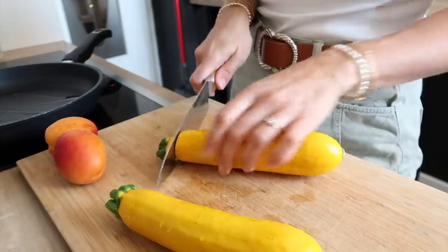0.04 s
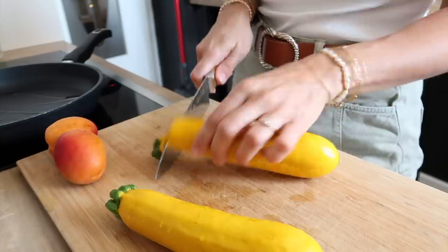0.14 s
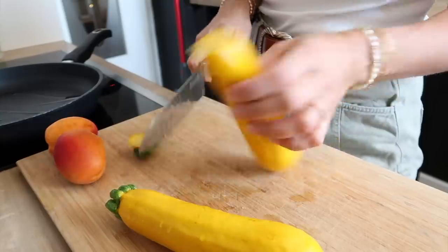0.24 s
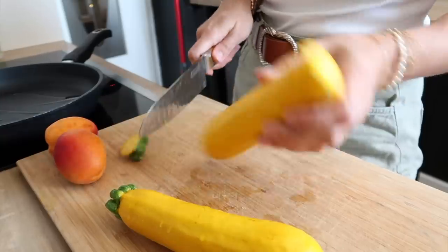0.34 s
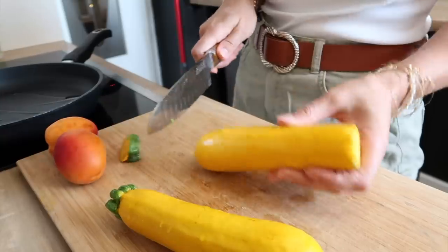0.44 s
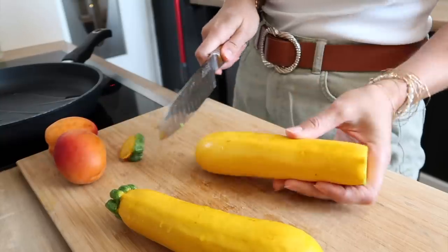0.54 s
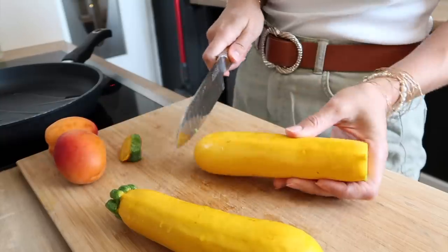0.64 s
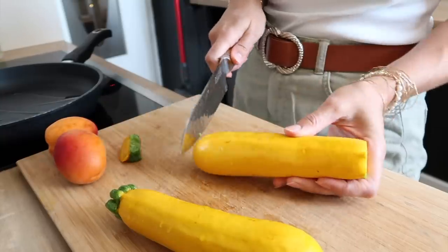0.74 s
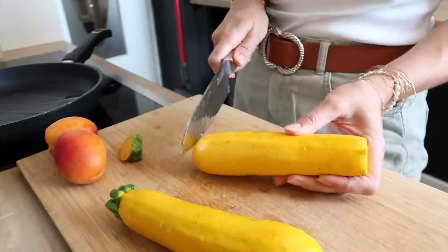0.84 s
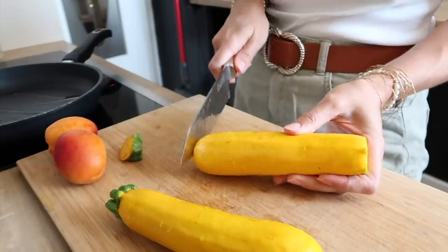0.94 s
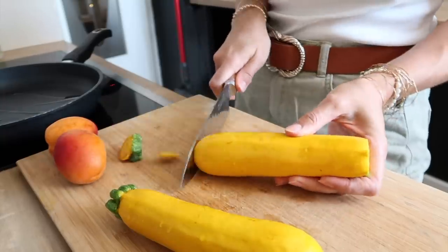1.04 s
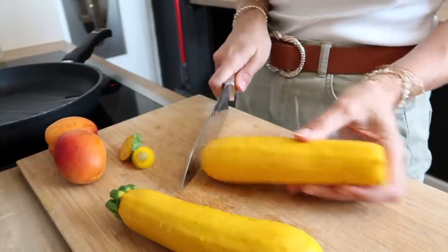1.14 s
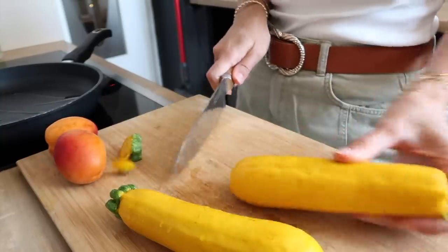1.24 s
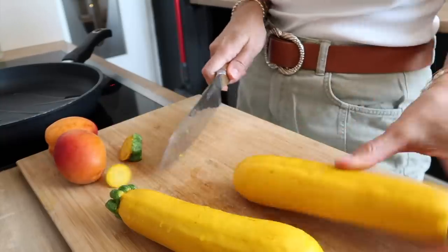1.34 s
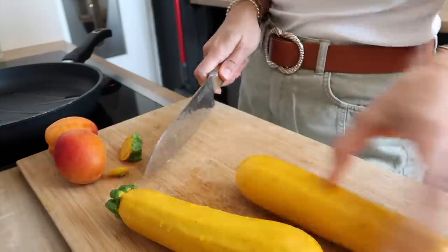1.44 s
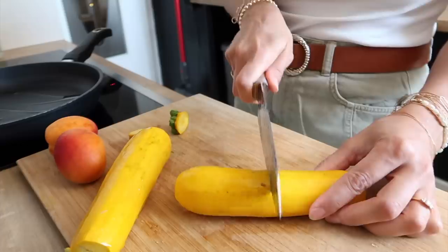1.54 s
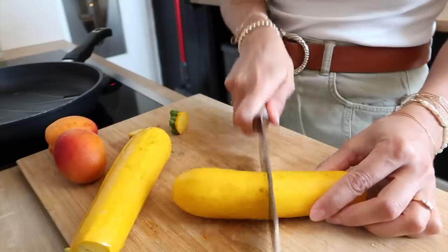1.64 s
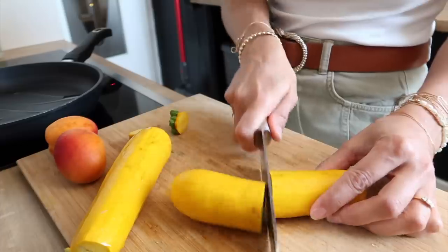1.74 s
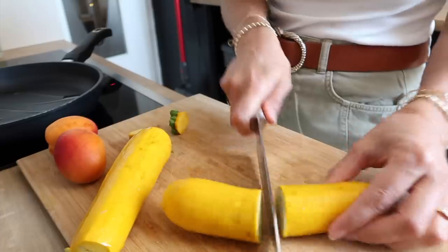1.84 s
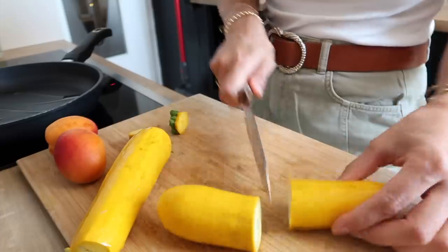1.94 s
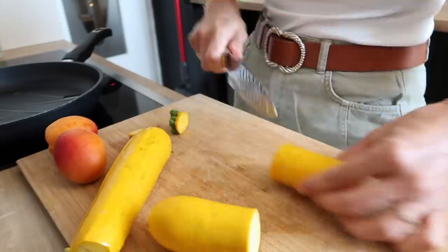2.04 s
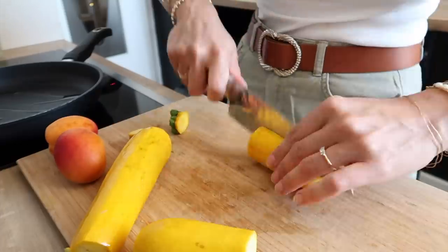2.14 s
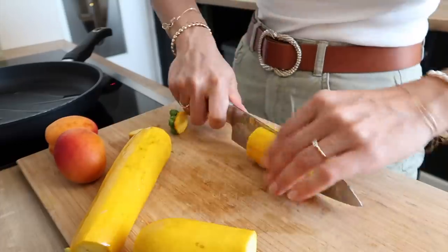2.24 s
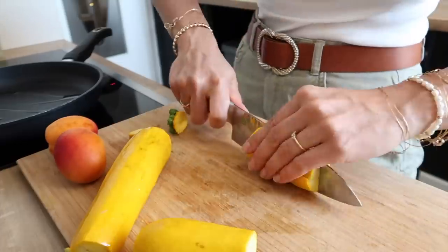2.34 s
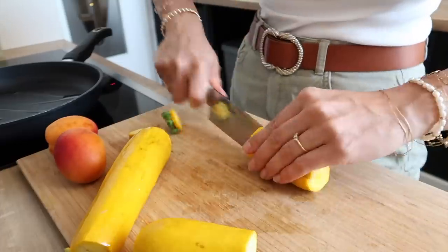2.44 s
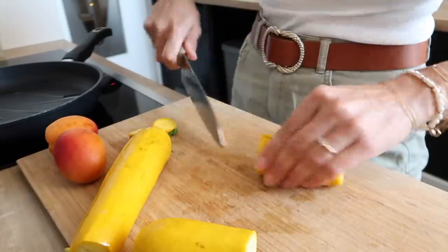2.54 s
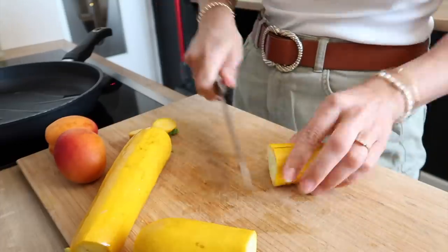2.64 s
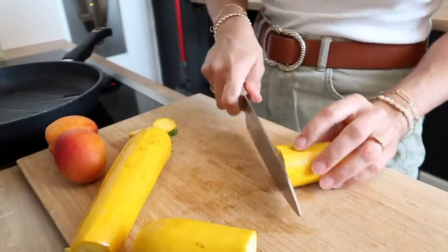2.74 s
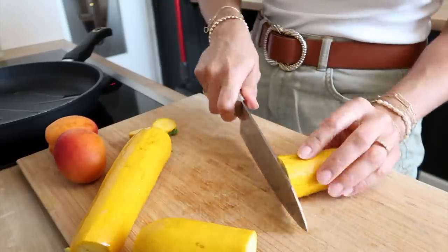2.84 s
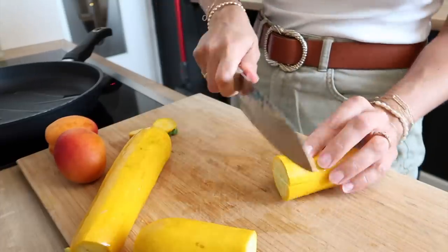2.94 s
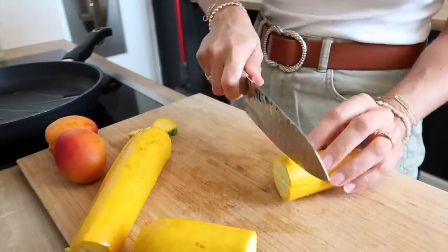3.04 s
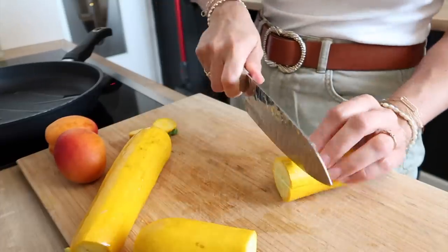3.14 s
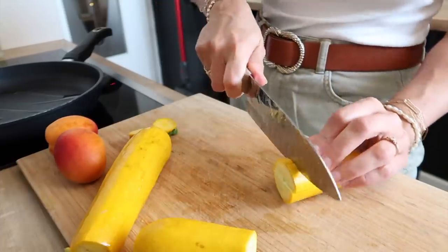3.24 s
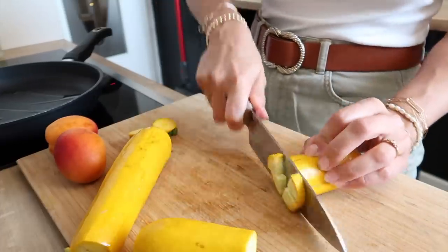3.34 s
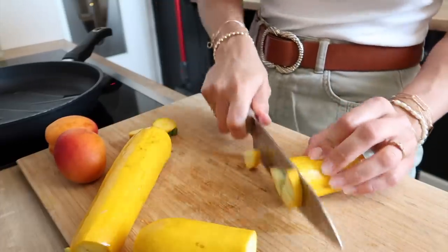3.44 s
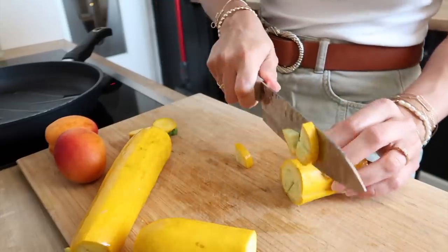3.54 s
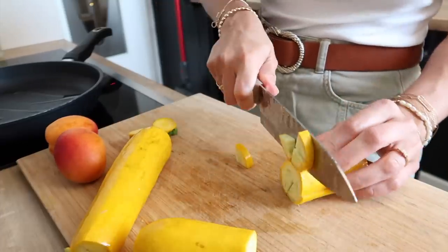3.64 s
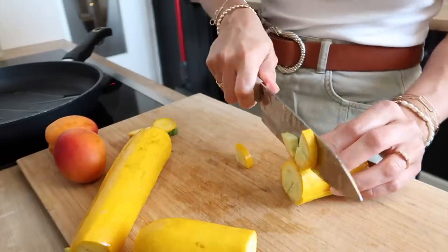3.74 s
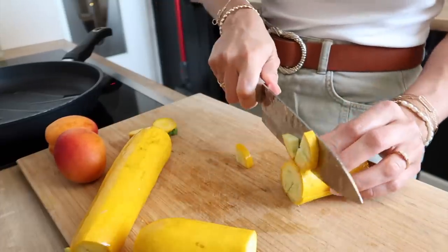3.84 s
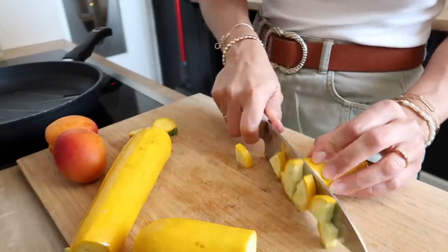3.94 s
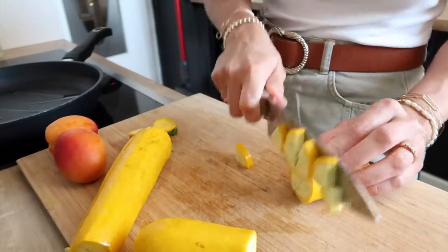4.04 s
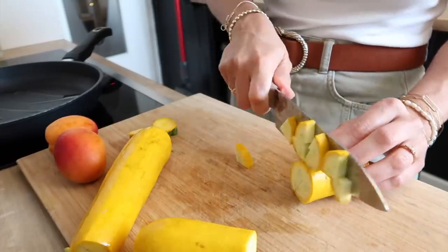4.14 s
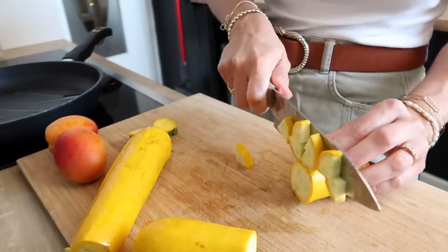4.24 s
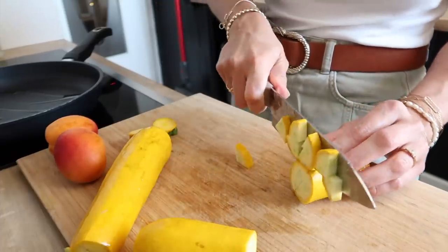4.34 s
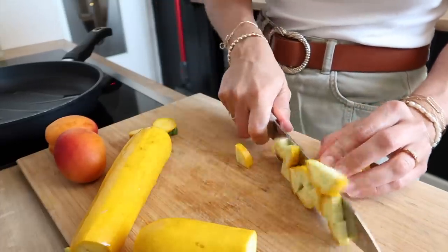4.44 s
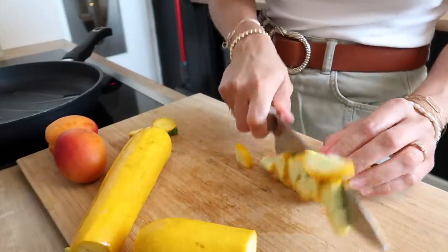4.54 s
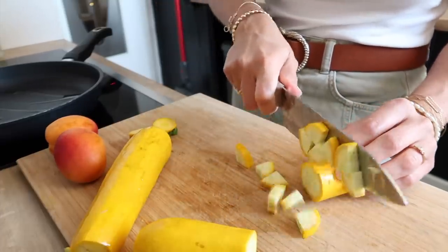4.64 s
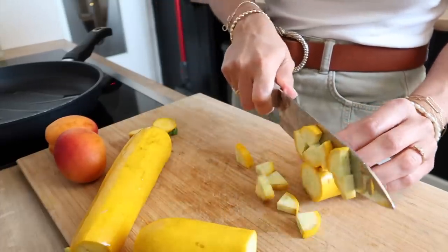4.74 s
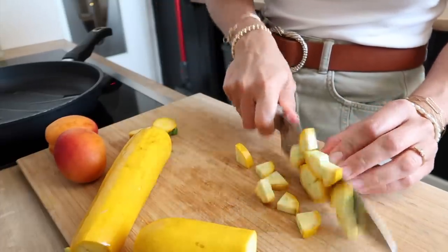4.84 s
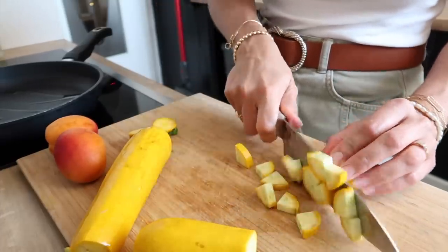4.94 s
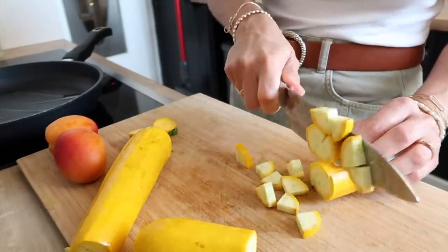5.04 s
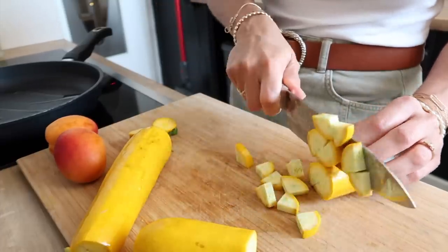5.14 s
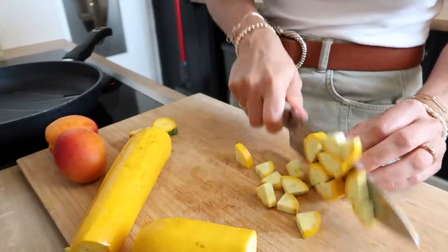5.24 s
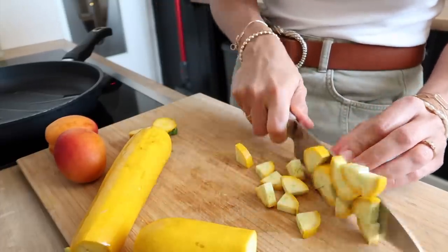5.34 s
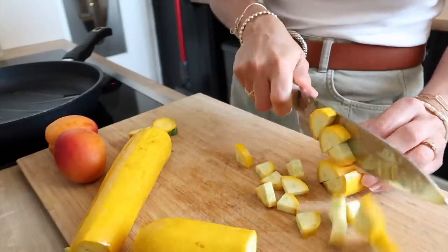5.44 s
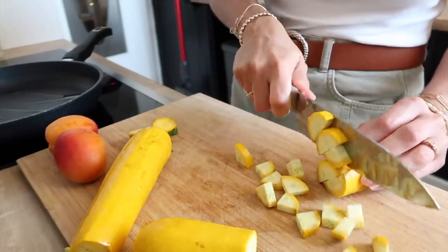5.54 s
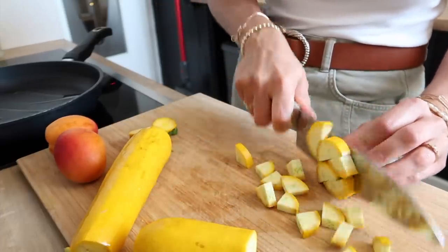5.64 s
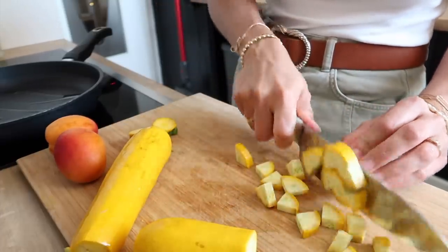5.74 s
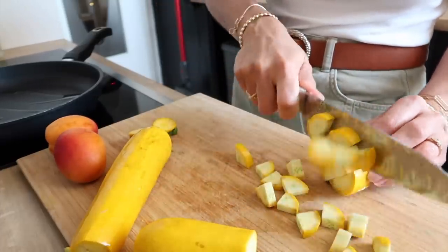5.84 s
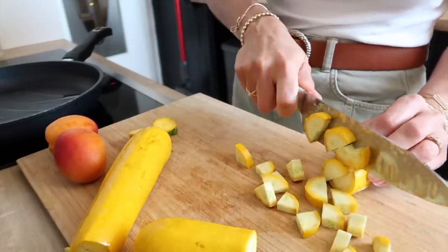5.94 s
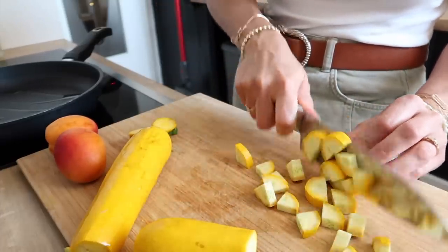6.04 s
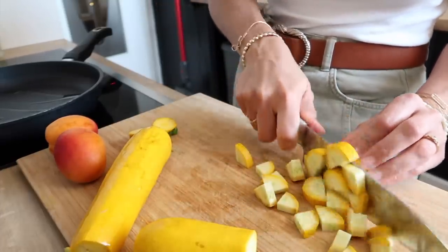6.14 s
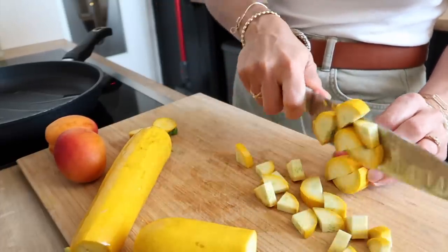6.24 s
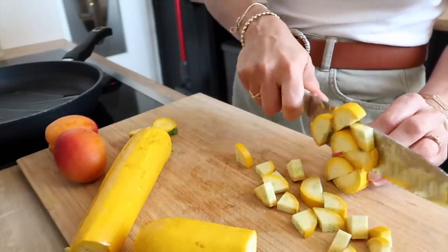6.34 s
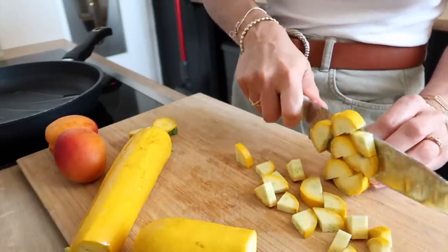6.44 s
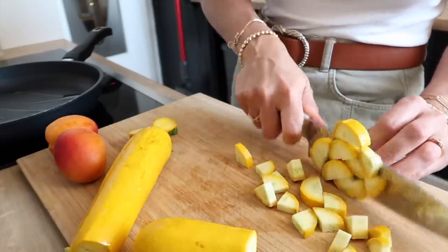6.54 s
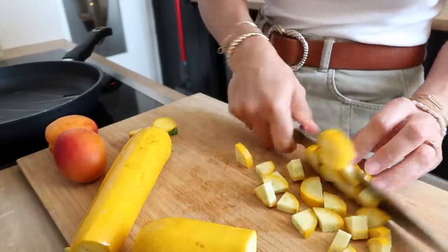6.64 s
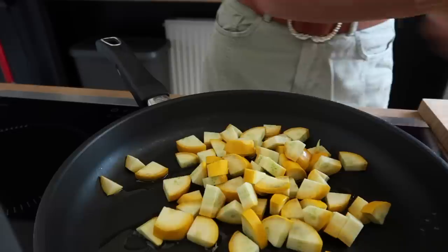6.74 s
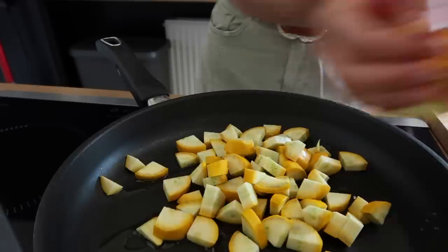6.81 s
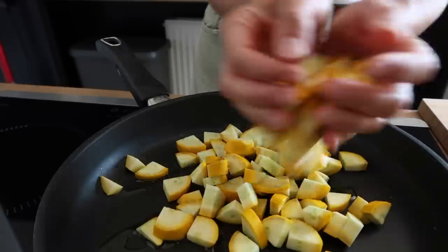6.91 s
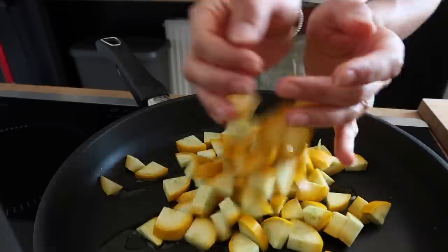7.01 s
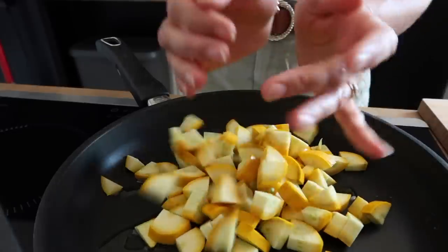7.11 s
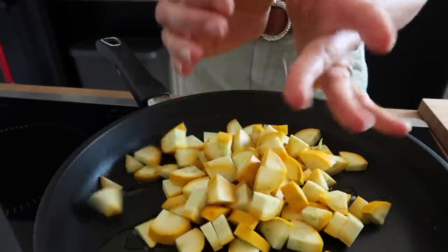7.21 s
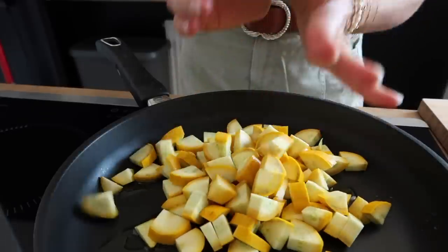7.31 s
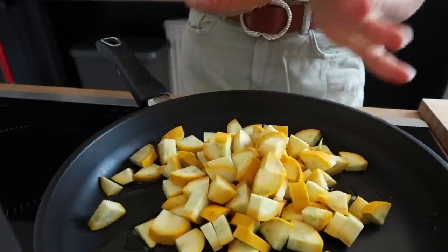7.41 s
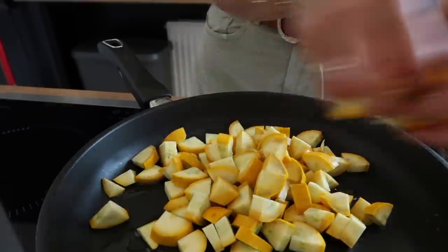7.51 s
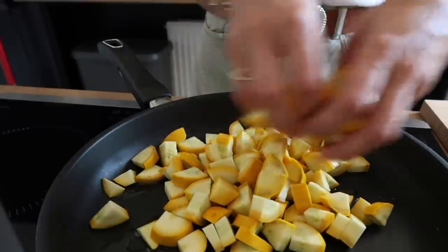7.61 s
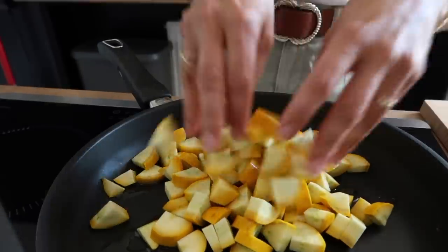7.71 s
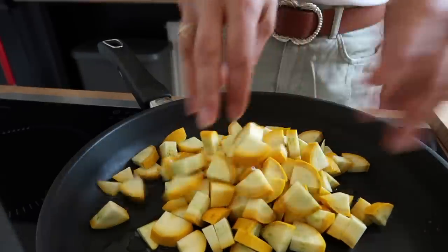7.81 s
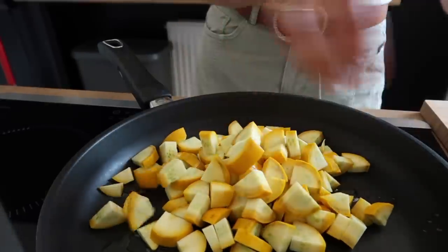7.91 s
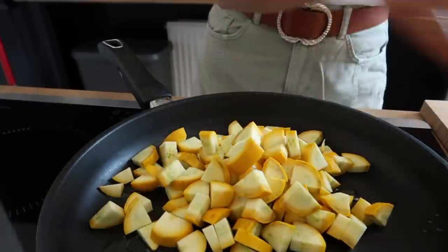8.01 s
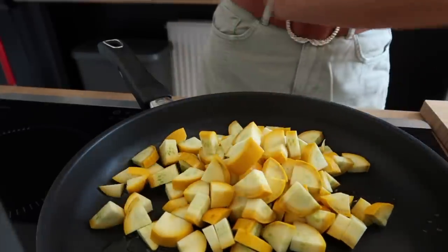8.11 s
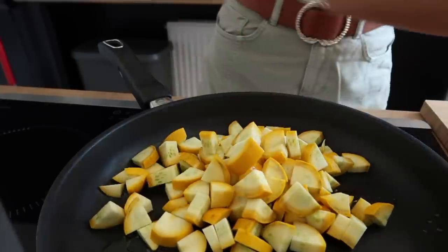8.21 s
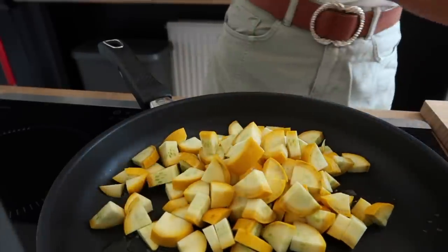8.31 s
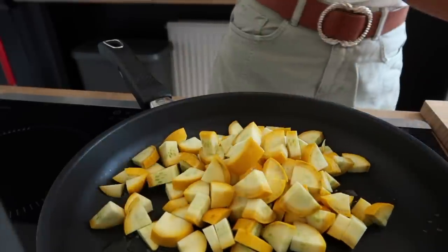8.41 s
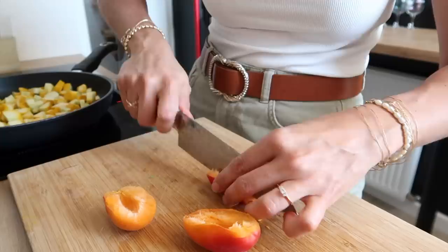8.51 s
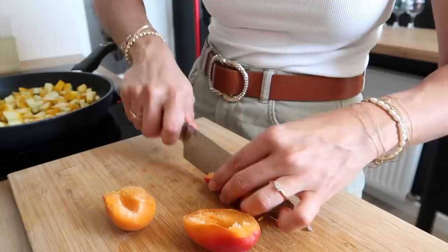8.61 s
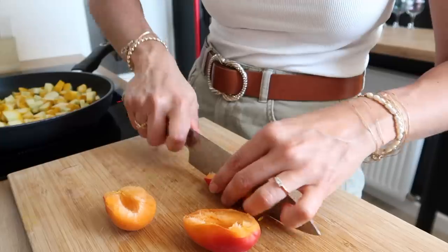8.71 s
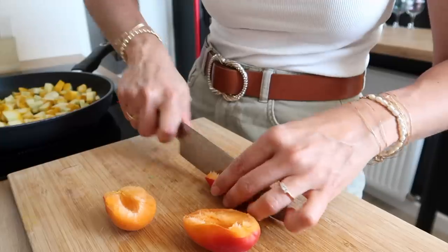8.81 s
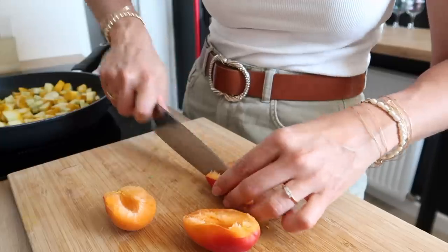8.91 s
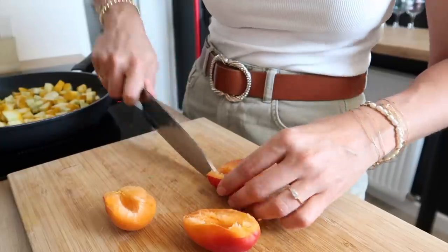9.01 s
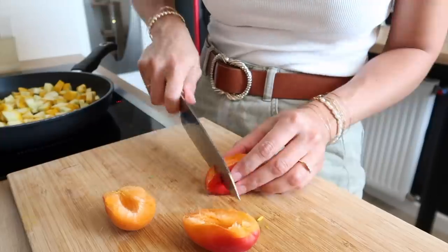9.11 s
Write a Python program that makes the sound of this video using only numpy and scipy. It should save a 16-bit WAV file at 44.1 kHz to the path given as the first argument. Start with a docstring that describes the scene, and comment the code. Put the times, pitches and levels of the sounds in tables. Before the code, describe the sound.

Close kitchen chopping: crisp slices ending in woody knocks, scrapes and soft thuds, then moist pieces tumbling into a heavy pan, with fan hum behind.

```python
"""A kitchen appliance hums under a whirring fan and soft hiss while a knife chops courgettes on a wooden board.
Blows ring the board's modes and the kitchen; before most, bursting cells crunch and the lower skin snaps.
Scrapes, steel ringing, soft thuds, light taps and juddering come between; from 7 s handfuls of cubes bump and
patter into a pan, strays ringing its metal, and near the end an apricot is cut. The recorder overloads, turns
itself down and creeps back, so the hum sinks and swells; at five joins the background steps in level."""
import sys
import numpy as np
from scipy import signal
from scipy.fft import rfft, irfft, next_fast_len
from scipy.io import wavfile
from scipy.ndimage import uniform_filter1d

SR = 44100
rng = np.random.default_rng(int(sys.argv[2]) if len(sys.argv) > 2 else 0)


def file_out(sig):
    """Save sig as 16-bit WAV at sys.argv[1]."""
    # one column per channel
    cols = np.atleast_2d(sig).T
    # limit, then scale
    lim = np.clip(cols, -1, 1)
    pcm = np.round(lim * 32767).astype(np.int16)
    wavfile.write(sys.argv[1], SR, pcm)


N = 404397
TIME = np.arange(N) / SR  # the whole timeline, s
AFTER = TIME[:SR * 2 // 3]  # time since one sound began, s


def amp(db):
    """Decibels to gain."""
    return 10 ** (np.asarray(db) / 20)


def unit(x):
    """Scales to rms 1."""
    return x / np.sqrt(np.mean(x ** 2) + 1e-20)


def read(points, hz):
    """Reads a table on a log-frequency axis."""
    f, value = np.transpose(points)
    return np.interp(np.log(hz + 1), np.log(f + 1), value)


def fade(t, t60):
    """Exponential decay: 60 dB down after t60 seconds."""
    return np.exp(-np.log(1000) * t / np.maximum(t60, 1e-4))


# where each stretch of the scene begins: start_s
STRETCH_STARTS = [0, 1.514, 2.146, 6.712, 8.548, 9.083]


def stretch_at(s):
    """Which stretch a moment belongs to."""
    return np.searchsorted(STRETCH_STARTS[1:], s, side="right")


END_FADE_S = 0.003


def add(mix, s, sound):
    """Places a sound, faded out by the end of its stretch."""
    start = max(round(s * SR), 0)
    end = min([round(j * SR) for j in STRETCH_STARTS if j > s] + [N])
    size = min(end - start, sound.shape[-1])
    fade_out = np.minimum(np.arange(size, 0, -1) / (END_FADE_S * SR), 1)
    mix[:, start:start + size] += sound[..., :size] * fade_out


# stereo spread of every coloured noise: pitch_hz, side_minus_mid_db
STEREO_WIDTH = [(60, -33), (130, -41), (270, -5), (580, -16), (1220, -15.5), (2600, -5)]


def coloured(pair, db_at):
    """Gives two unrelated signals a spectrum and spreads them as mid and side, rms 1."""
    size = pair.shape[1]
    padded = next_fast_len(size + 2048)
    hz = np.fft.rfftfreq(padded, 1 / SR)
    mid, side = rfft(pair, padded) * amp(db_at(hz))
    side = side * amp(read(STEREO_WIDTH, hz))
    return unit(irfft(np.array([mid + side, mid - side]), padded)[:, :size])


def noise(size):
    """Two channels of white noise."""
    return rng.standard_normal((2, size))


def grains(size, per_s, spread_db):
    """Random clicks whose level shifts by spread_db times an exponential draw."""
    sizes = amp(spread_db * np.minimum(rng.exponential(1, size), 4))
    return noise(size) * sizes * (rng.random(size) < per_s / SR)


def ring(modes, stretch=1):
    """Damped sines that start together."""
    return sum(amp(db) * fade(AFTER, t60 * stretch) * np.sin(2 * np.pi * hz * AFTER) for hz, db, t60 in modes)


# how fast the kitchen dies away, before the stretch's echo length factor: pitch_hz, t60_s
KITCHEN_DECAY = [(100, 0.17), (300, 0.3), (800, 0.4), (1800, 0.38), (4500, 0.38), (12000, 0.13)]


def dying(sound, stretch=1, build_s=0.0033):
    """Reflections gather within milliseconds, then each band dies at the kitchen's rate."""
    hz, t, z = signal.stft(sound, SR, nperseg=256)
    decay = fade(t, stretch * read(KITCHEN_DECAY, hz)[:, None])
    tail = signal.istft(z * decay, SR, nperseg=256)[1]
    return tail[:, :len(AFTER)] * (1 - np.exp(-(AFTER / build_s) ** 2))


def resonate(x, hz, width_hz):
    """A resonance of gain 1 that follows a pitch curve."""
    turn = np.exp(2j * np.pi * np.cumsum(hz) / SR)
    r = np.exp(-np.pi * width_hz / SR)
    return 2 * (turn * signal.lfilter([1 - r], [1, -r], x / turn)).real


# each stretch's backdrop and limits: hum_db, hiss_db, echo_length_factor, clipping_point_db
STRETCHES = [(-35, -42, 1.314, 3.5), (-39, -44.5, 1.26, 1.5), (-38, -47, 0.7, -2.5), (-47, -56, 1, -1),
             (-35.5, -43, 1.36, -0.5), (-39.5, -47, 1.1, 1.5)]
# colour of the hiss: pitch_hz, level_db_per_hz
AIR_COLOUR = [(20, -11.5), (110, -3), (200, -4.5), (300, -16.5), (400, -14), (620, -19.5), (1000, -20.5),
              (1600, -24.5), (3000, -30), (5000, -37), (8000, -41.5), (14000, -51.5)]
# whirring fan tones: pitch_hz, width_hz, level_against_hiss_db
FAN_TONES = [(466, 2.8, -15), (506.6, 12, -13), (737, 14, -14)]
# colour of the extra hiss beside the pan: pitch_hz, level_db_per_hz
STOVE_COLOUR = [(30, -36), (110, 1.5), (200, -6.5), (380, -5), (620, -15), (1000, -18.5), (2000, -19),
                (3200, -24), (5000, -30), (8000, -36.5), (14000, -50)]
HUM_HZ, STOVE_DB = 49.6, -47.5


def background(octave_db=-15, waver=0.012):
    """An appliance's hum, its pitch wavering, and whirring fan over soft hiss; near the pan more hiss is added."""
    stretch = stretch_at(TIME)
    hum_db, hiss_db, *_ = np.array(STRETCHES)[stretch].T
    drift = uniform_filter1d(rng.standard_normal(N), size=4000)
    drift = unit(uniform_filter1d(drift, size=4000))
    turn = 2 * np.pi * np.cumsum(HUM_HZ * (1 + waver * drift)) / SR
    hum = unit(np.sin(turn) + amp(octave_db) * np.sin(2 * turn))
    air = coloured(noise(N), lambda hz: read(AIR_COLOUR, hz))
    for tone_hz, width_hz, db in FAN_TONES:
        air += amp(db) * coloured(noise(N), lambda hz: -20 * np.log10(1 + ((hz - tone_hz) / width_hz) ** 2))
    by_pan = stretch == stretch_at(HANDFULS[0][0])
    stove = amp(STOVE_DB) * by_pan * coloured(noise(N), lambda hz: read(STOVE_COLOUR, hz))
    return hum * amp(hum_db) + air * amp(hiss_db) + stove


# blade meets board: start_s, force_db, ring_length_factor, treble_db, room_against_force_db, echo_pitch_factor,
# board_pitch_factor, time_in_flesh_s (0 = bare knock), crunch_db, skin_fizz_db, snap_length_s
CHOPS = [ (0.0003, 6.5, 1.5, 3.5, -11.5, 1.22, 1.17, 0.018, -83, -5, 0.011),
         (0.2945, -1, 1.3, -14, -26, 0.82, .9, 0, -90, 0, 0),
         (1.0684, 18.5, 1.67, 4.5, -14, 1.223, 1.2, 0.018, -18, 2, 0.0038),
         (1.739, 10, 4.2, 9.5, -7.5, 1.01, .96, 0.079, -24.5, 4, 0.011),
         (2.2476, -3.5, 1.4, 0.5, -16, 0.97, 1.1, 0.081, -35.5, 6.5, 0),
         (2.7561, -6.5, 1.6, -5.5, -14, 0.95, 1.05, 0.012, -91, 2, 0.026),
         (2.8971, -9, 1.1, 4.5, -11.5, 0.99, 1, 0.0012, -38, 4.5, 0.011),
         (3.4042, -8.5, 1.36, 0.5, -9, 1.2, 1.03, 0.074, -31.5, 12.5, 0.017),
         (3.9866, 2.5, 0.84, 8, -15, 0.93, 1, 0.062, -33.5, 7, 0.015),
         (4.4944, 4, 1.63, 5.5, -14.5, 0.89, 1, 0.053, -31, 1.5, 0.0043),
         (4.9172, 5.5, 2.25, 6.5, -15, 0.98, 1, 0.064, -34, 0, 0.01),
         (5.3255, 3, 2.6, 3.5, -13, 0.99, .93, 0.071, -33, 3, 0.0082),
         (5.7194, -11.5, 5.1, 1.5, 0, 0.84, .9, .058, -30.5, -3.5, .0036),
         (6.1272, 1.5, 1.57, 5.5, -12, 0.98, .9, 0.069, -31, 0.5, 0.013),
         (6.6181, 4.5, 3.1, 4, -11, 0.92, .94, 0.096, -34, 2, 0.0039),
         (8.405, -23.5, 3.8, -3, -4.5, 0.78, .85, 0.037, -90.5, -4.5, 0),
         (8.53, -18.5, 1.4, -6.5, -8, 0.6, 0.77, 0, -84, 0, 0),
         (8.6596, 1, 2.1, -5.5, -11.5, 0.88, 1.06, 0.064, -39.5, 3, 0.011)]
# the board's bending modes, damped at once by the pressing blade, before each chop's
# pitch, length and tone settings: pitch_hz, level_db, t60_s
BOARD_MODES = [(191.5, -24.5, 0.017), (521, -37, 0.0019), (642, -36, 0.074), (787, -18.5, 0.028),
               (1105, -6, 0.023), (1406, 2.5, 0.011), (1820, -20, 0.035), (2265, -11.5, 0.0082),
               (2900, -17, 0.0074), (3470, -10, 0.0025), (3910, -22.5, 0.027), (6665, -30, 0.0046)]
# board and worktop ringing on, before the echo length and tone settings: pitch_hz, level_db, t60_s
WORKTOP_MODES = [(98.4, -15, 1), (483, -18, 0.13), (595, -6.5, 0.45), (700, -2.5, 0.23), (898, -9, 0.25),
                 (963, -5.5, 0.28), (1180, -8.5, 0.36), (1234, -13.5, 0.25), (1306, -8, 0.11),
                 (1456, -7, 0.37), (1489, -9, 0.34), (1524, -11.5, 0.45), (1718, -12, .25),
                 (1840, -12.5, .27), (1904, -14, 0.2), (2020, -16, 0.27), (2087, -15, 0.36),
                 (2199, -14, .27), (2430, -16.5, 0.34), (2860, -19.5, 0.2), (3150, -23, 0.3)]
# the kitchen's answer to a knock, before the chop's echo pitch factor: pitch_hz, level_db_per_hz
KITCHEN_ANSWER = [(30, -31), (60, -6.5), (110, 1), (200, -1), (310, -9), (520, -3.5), (700, -3), (1100, -1),
                  (1400, -2.5), (1900, -10), (2400, -17.5), (3200, -23.5), (4000, -29.5), (6000, -37),
                  (9000, -54), (14000, -76)]
BASS_DB, BASS_PER_FORCE_DB = -2.5, -0.12  # a harder blow carries less bass


def knocks(tick_db=-18, tick_t60=0.01, ring_db=-2, wash_db=4.5, early=0.2, early_s=0.0072, early_width_s=0.05,
           alike=0.66, contact_hz=6000, apart=0.2, radiates_hz=420, spot_db=4.5, room_treble=0.23):
    """The edge strikes the board, the worktop rings on and the kitchen answers; each spot favours other modes."""
    out, walls = np.zeros((2, N)), noise(len(AFTER))
    alike = np.clip(alike, 0, 1)
    # cupboards and the cook's body reflect first
    nearby = 1 + early * np.exp(-((AFTER - early_s) / early_width_s) ** 2)
    # each mode reaches the two sides out of step
    arrival = rng.uniform(0, 2 * np.pi, (len(WORKTOP_MODES), 1, 1))
    arrival = arrival + apart * rng.standard_normal((len(WORKTOP_MODES), 2, 1))
    for s, force_db, stretch, treble_db, room_db, pitch, board_pitch, *_ in CHOPS:
        decay = STRETCHES[stretch_at(s)][2]

        def tone(hz, share=1):
            """Tilts treble by the sharpness of the contact and bass by its force."""
            bass_db = BASS_DB + BASS_PER_FORCE_DB * force_db
            return read([(450, bass_db), (1000, 0), (1400, 0), (3500, share * treble_db)], hz)

        def tick_colour(hz):
            """A bright hump around 2.5 to 4 kHz."""
            return read([(800, -3.0), (2500, 17.0), (4200, 12.5), (8000, -12.0), (15000, -32.5)], hz)

        def wash_colour(hz):
            """The kitchen's answer, shifted in pitch."""
            return read(KITCHEN_ANSWER, hz / pitch) + tone(hz / pitch ** 2, room_treble)

        blow = ring([(hz * board_pitch, db + tone(hz), t60) for hz, db, t60 in BOARD_MODES], stretch)
        tick = coloured(noise(len(AFTER)), tick_colour) * fade(AFTER, tick_t60 * stretch)
        blow = blow + amp(tick_db + treble_db) * tick
        # a cushioned edge takes longer to stop
        corner_hz = min(contact_hz * amp(treble_db), SR / 3)
        blow = signal.lfilter(*signal.butter(N=3, Wn=corner_hz, fs=SR), blow)
        # a small board radiates little bass
        blow = signal.lfilter(*signal.butter(N=2, Wn=radiates_hz, btype="high", fs=SR), blow)
        # the echoes change as the blade moves
        scatter = alike * walls + np.sqrt(1 - alike ** 2) * noise(len(AFTER))
        wash = dying(coloured(scatter, wash_colour), decay)
        worktop = 0
        for (hz, db, t60), late in zip(WORKTOP_MODES, arrival):
            answer_db = read(KITCHEN_ANSWER, hz / pitch) - read(KITCHEN_ANSWER, hz)
            mode_db = db + tone(hz, room_treble) + answer_db + spot_db * rng.standard_normal()
            mode_hz = hz * rng.normal(1, 0.0042)
            worktop = worktop + amp(mode_db) * fade(AFTER, t60 * decay) * np.sin(2 * np.pi * mode_hz * AFTER + late)
        worktop = worktop * (1 - np.exp(-AFTER / 0.0023))
        room = nearby * (amp(wash_db) * wash + amp(ring_db) * worktop)
        add(out, s, amp(force_db) * (blow + amp(room_db) * room))
    return out


# colour of bursting flesh, before tilt and rasp: pitch_hz, level_db_per_hz
CRUNCH_COLOUR = [(100, -28), (400, -1), (800, -3), (1300, 3), (1900, -3.5), (2600, -6.5), (3500, -5.5),
                 (5000, -16.5), (7000, -23), (10000, -39), (14000, -40)]


def crunch(length, rise_db, tilt_db, rasp_hz, fizz_db=0, cells_per_s=5000, spread_db=0.0, smooth=0.72,
           rasp_width_hz=450, rasp_db=1, clump_db=2.9):
    """Cell walls burst in clumps under the edge and excite a gliding rasp; wet steel hisses along."""
    size = len(AFTER)

    def flesh(hz):
        """The flesh's colour, tilted per octave, with fizz on top."""
        tilt = tilt_db * np.log2(np.maximum(hz, 500))
        return read(CRUNCH_COLOUR, hz) + tilt + read([(4500, 0.002), (10000, fizz_db)], hz)

    bursts = unit(grains(size, cells_per_s, spread_db)) + smooth * noise(size)
    sound = coloured(bursts, flesh)
    glide_hz = np.interp(AFTER, [0, length], rasp_hz)
    sound = unit(sound + amp(rasp_db) * resonate(sound, glide_hz, rasp_width_hz))
    clumps = unit(uniform_filter1d(rng.standard_normal(size), size=200))
    edges = np.clip(AFTER / (.25 * length), 0, 1) * np.clip((length - AFTER) / .004, 0, 1)
    swell_db = np.interp(AFTER, [0, length], [-rise_db, 0])
    return sound * edges * amp(swell_db + clump_db * clumps)


def snap(length):
    """The lower skin gives way in a short burst of noise."""
    colour = [(200, -14), (700, -6), (1400, 0), (3500, -9), (7000, -23), (15000, -40)]
    burst = coloured(noise(2048), lambda hz: read(colour, hz))
    size = int(np.clip(length * SR, 64, 2048))
    return burst[:, :size] * np.linspace(.6, 1.2, size)


# the blade drags slowly over skin or wood: start_s, length_s, final_db, swell_db, brightness_db_per_octave,
# rasp_from_hz, rasp_to_hz, board_rumble_db, catches_per_s
SCRAPES = [(0.145, 0.12, -35, -8, 0.5, 1900, 1900, -21.5, 2300),
           (0.919, 0.16, -46.5, 7.5, 8.5, 1920, 2430, -40, 1600),
           (1.516, 0.18, -44.5, 0.5, 2.5, 2440, 2800, -61, 3500),
           (2.147, 0.014, -40.5, 0, 1, 1566, 1720, -47, 6400),
           (2.18, 0.053, -35.5, 1.5, 2, 1610, 3300, -37, 4300),
           (2.412, 0.18, -29.5, 6, -1, 1750, 2450, -40, 4500),
           (8.289, 0.158, -32.5, 17.5, -1, 910, 2300, -48, 1000),
           (8.444, 0.096, -45.5, -5, 4, 1500, 1490, -50, 1500),
           (8.761, 0.25, -26.5, 12, 0.5, 2700, 1860, -64, 2500),
           (8.975, 0.12, -29, 3, 2, 1690, 1580, -54, 5100)]
# the board under a leaning hand: pitch_hz, level_db_per_hz
RUMBLE_COLOUR = [(30, -25), (65, -5.5), (100, -2.5), (190, -5.5), (400, -22.5), (1000, -50.5),
                 (4000, -86.5)]
# the blade's rasp sinks as it goes deeper: from_hz, to_hz
SLICE_RASP_HZ = (2700, 2300)
SLICE_RISE_DB, SLICE_TILT_DB = 16.5, 3.5  # tilt is per octave
SNAP_DB = 8  # gain of the snap over the chop's crunch setting


def slicing(room_db=-7):
    """A quick crunch and a snap lead up to each cut; slow, coarser scrapes come between and make the board rumble."""
    out = np.zeros((2, N))
    echoes = [dying(noise(len(AFTER)), decay) for _, _, decay, _ in STRETCHES]

    def heard(s, sound):
        """The direct sound, then the kitchen."""
        echo = echoes[stretch_at(s)]
        response = amp(room_db) * echo / np.linalg.norm(echo[0]) + (AFTER == 0)
        return signal.fftconvolve(sound, response, axes=1)

    for s, *_, flesh_s, db, fizz_db, snap_s in CHOPS:
        if flesh_s > 0:
            cut = crunch(flesh_s, SLICE_RISE_DB, SLICE_TILT_DB, SLICE_RASP_HZ, fizz_db)
            add(out, s - flesh_s, amp(db) * heard(s, cut))
            add(out, s - snap_s, amp(db + SNAP_DB) * heard(s, snap(snap_s)))
    for s, length, db, rise_db, tilt_db, from_hz, to_hz, rumble_db, catches_per_s in SCRAPES:
        scrape = crunch(length, rise_db, tilt_db, (from_hz, to_hz), cells_per_s=catches_per_s,
                        rasp_db=6.5, clump_db=0.35)
        add(out, s, amp(db) * heard(s, scrape))
        lean = np.sin(np.pi * np.minimum(AFTER / length, 1) ** 2)
        rumble = coloured(noise(len(AFTER)), lambda hz: read(RUMBLE_COLOUR, hz))
        add(out, s, amp(rumble_db) * lean * rumble)
    return out


# the steel blade rings as it grates free: start_s, grating_time_s, level_db, brightness_db_per_octave
BLADE_RINGS = [(0.156, 0.072, -34.5, 3), (2.57, 0.0099, -44, 3), (2.757, 0.017, -38, -10.5)]
# the steel's modes, before that brightness: pitch_hz, level_db, t60_s
BLADE_MODES = [(3050, 1, 0.12), (3410, -12, 0.12), (4280, -4, 0.13), (5560, -7, .25), (6510, -9, 0.63),
               (6550, -2, .12), (7820, 5, 0.083), (8430, -8, 0.27)]


def blade(grit_db=-5, grit_t60=0.3):
    """The grating edge feeds the steel's modes, which die away once it comes free."""
    out = np.zeros((2, N))
    for s, length, db, tilt_db in BLADE_RINGS:
        drag = np.minimum(AFTER / length, 1)
        modes = ring([(hz, mode_db + tilt_db * np.log2(hz), t60) for hz, mode_db, t60 in BLADE_MODES])
        grating = noise(len(AFTER)) * drag * (AFTER < length)
        steel = signal.fftconvolve(grating, modes[None], axes=1)[:, :len(AFTER)]
        # short-term rms peaks at 1
        steel = steel / np.sqrt(uniform_filter1d((steel ** 2).mean(0), size=600).max())
        grit = coloured(noise(len(AFTER)), lambda hz: read([(1000, -16), (3200, 17), (8000, 3), (13000, -27)], hz))
        grit = grit * drag * fade(np.maximum(AFTER - length, 0), grit_t60)
        add(out, s, amp(db) * (steel + amp(grit_db) * grit))
    return out


# soft heavy thuds, something landing or the hollow low body of a hard chop:
# start_s, level_db, main_pitch_hz, t60_s
THUDS = [(0.469, -9, 104.4, 0.29), (1.069, 0, 520.5, 0.069), (1.447, 8.5, 154.6, 0.15),
         (1.739, 9, 530, 0.068), (5.716, -10.5, 167, 0.14), (5.934, -21, 129, 0.1), (7.028, -29, 97, .25),
         (7.084, -24, 78.5, 0.52), (7.156, -15.5, 117, 0.17), (7.307, -24.5, 137.7, 0.17),
         (7.709, -33.5, 85, .35), (7.825, -26.5, 115, 0.21), (7.867, -29, 127.1, 0.32),
         (8.21, -27.5, 129.6, 0.25), (8.352, -29, 94.5, 0.25), (8.528, -26, 100, 0.13)]
# modes of each thud; t60 is divided by the multiple: multiple_of_main_pitch, level_db
THUD_MODES = [(0.719, -1), (0.997, 2), (1.349, -1), (1.9, -3)]


def thuds(soft_s=0.0048):
    """A soft heavy impact sets off a few low damped modes with a rounded onset."""
    out = np.zeros((2, N))
    for s, db, hz, t60 in THUDS:
        body = ring([(hz * k, mode_db, t60 / k) for k, mode_db in THUD_MODES])
        add(out, s, amp(db) * body * (1 - np.exp(-AFTER / soft_s)))
    return out


# light taps of pieces and fingers: start_s, level_db, centre_hz, contact_t60_s
TAPS = [(.469, -12.5, 845, 0.029), (.577, -16, 1620, 0.019), (1.444, 3, 900, 0.025), (1.45, 1.5, 900, 0.03),
        (2.577, -27, 2700, 0.019), (2.639, -37, 4480, 0.013), (3.372, -29, 3610, .02),
        (3.82, -44.5, 1106, 0.031), (4.711, -32, 1190, 0.035), (4.741, -27, 998, 0.03),
        (5.567, -16.5, 2180, 0.015), (5.722, -5.5, 990, 0.018), (5.729, -5, 960, 0.025),
        (5.933, -25.5, 834, 0.056), (6.932, -42.5, 3000, 0.017), (6.99, -37, 2140, 0.036),
        (7.025, -26.5, 1000, 0.016), (7.034, -29, 2240, 0.021), (7.05, -31.5, 2400, 0.033),
        (7.073, -29, 2020, 0.032), (7.083, -31, 2300, 0.02), (7.1326, -15, 2540, 0.01),
        (7.147, -31, 2400, .012), (7.248, -35, 900, 0.026), (7.303, -33, 1270, .02),
        (7.332, -32, 1000, 0.023), (7.379, -38, 900, 0.021), (7.419, -38, 1220, .015),
        (7.686, -42.5, 2200, 0.015), (7.701, -36, 3230, 0.016), (7.714, -30.5, 2470, 0.011),
        (7.763, -46, 3000, 0.011), (7.808, -41, 1900, 0.013), (7.837, -36, 2620, .022),
        (7.874, -30, 1200, 0.0088), (7.981, -39, 1200, 0.014), (8.205, -35, 800, 0.029),
        (8.251, -37, 2600, 0.017), (8.326, -31, 1930, .02), (8.337, -31, 750, 0.029),
        (8.351, -28, 790, .025), (8.407, -23.5, 1700, 0.026), (8.42, -21.5, 1680, 0.036),
        (8.437, -28.5, 2400, 0.024)]


def taps(steep_db=11.5, room_db=-14, damp_hz=3200, click_db=0, click_t60=0.0088, long_contact_s=0.028):
    """A piece lands with a click and a short damp patter; a longer contact stirs the room more."""
    out = np.zeros((2, N))
    for s, db, centre_hz, contact_t60 in TAPS:
        def hump(hz):
            """A broad peak at the contact's centre pitch; moist flesh gives little treble."""
            peak_db = -steep_db * np.hypot(np.log2((hz + 1) / centre_hz), .7)
            return peak_db - 10 * np.log10(1 + (hz / damp_hz) ** 6)

        patter = coloured(noise(len(AFTER)), hump) * fade(AFTER, contact_t60)
        tick = patter + ring([(centre_hz, click_db, click_t60)])
        tick = tick * np.sin(np.pi / 2 * np.minimum(AFTER / .0006, 1)) ** 2  # soft onset
        echo = dying(coloured(noise(len(AFTER)), hump), STRETCHES[stretch_at(s)][2])
        add(out, s, amp(db) * (tick + amp(room_db) * contact_t60 / long_contact_s * echo))
    return out


# the blade jams and judders in firm flesh: start_s, end_s, level_db, main_width_hz, main_hz, second_hz, third_hz
JUDDERS = [(0.923, 1.05, -44, 170, 3050, 1920, 4300), (1.677, 1.748, -24, 49.4, 1890, 1650, 3190),
           (4.86, 4.9, -41.5, 118.8, 2340, 2900, 4255), (5.281, 5.309, -29.5, 120.5, 2470, 3000, 4300),
           (9.05, 9.068, -22, 70, 1520, 1640, 3420)]


def juddering(slips_per_s=1500, second_db=-5, third_db=-6, side_width_hz=140, grit_db=-21, onset_s=0.022):
    """Quick uneven slips ring one main and two weaker resonances of the gripped blade."""
    out = np.zeros((2, N))
    for start, end, db, width_hz, main_hz, second_hz, third_hz in JUDDERS:
        def gripped(hz):
            """Three damped peaks over the crunch of the flesh."""
            peaks = [(main_hz, width_hz, 0), (second_hz, side_width_hz, second_db),
                     (third_hz, side_width_hz, third_db)]
            resonances = sum(amp(d) / (1 + ((hz - f) / w) ** 2) for f, w, d in peaks)
            return 20 * np.log10(resonances + amp(grit_db + read(CRUNCH_COLOUR, hz)))

        slips = coloured(grains(len(AFTER), slips_per_s, spread_db=1.5), gripped)
        edges = np.clip(np.minimum(AFTER / onset_s, (end - start - AFTER) / 0.0022), 0, 1)
        add(out, start, amp(db) * slips * edges)
    return out


POUR_ATTACK_S, THUMP_FALL_DB_PER_S, PATTER_FALL_DB_PER_S = 0.046, 83, 151.5


def pour(start, length, fall_db_per_s):
    """A handful starts to fall, keeps falling, then settles."""
    t = TIME - start
    return np.clip(t / POUR_ATTACK_S, 0, 1) * amp(-fall_db_per_s * np.maximum(t - length, 0))


# handfuls of cubes dropped into the pan: start_s, pouring_time_s, thumping_db, wet_patter_db
HANDFULS = [(6.984, 0.19, -31, -44), (7.27, 0.11, -37, -57), (7.695, 0.18, -39.5, -55.5),
            (8.171, 0.21, -35.5, -52)]
# colour of the heavy pan under the heap: pitch_hz, level_db_per_hz
PAN_COLOUR = [(30, -37), (60, -16), (92, 5), (147, -3), (196, -12), (240, -12.5), (380, -16), (465, -15.5),
              (640, -20.5), (741, -21), (1470, -31), (4000, -53), (15000, -86)]


def tumbling(cubes_per_s=260, pan_t60=0.15, patter_per_s=200, squish_t60=0.028):
    """Cubes bump the heavy pan through the heap and patter wetly on one another."""
    bump = noise(len(AFTER)) * fade(AFTER, pan_t60)
    bumps = signal.fftconvolve(grains(N, cubes_per_s, spread_db=-2.5), bump, axes=1)[:, :N]
    bumps = coloured(bumps, lambda hz: read(PAN_COLOUR, hz))
    squish = noise(len(AFTER)) * fade(AFTER, squish_t60)
    touches = signal.fftconvolve(grains(N, patter_per_s, spread_db=0.5), squish, axes=1)[:, :N]
    wet = [(200, -13), (500, -17), (1100, 8), (1800, -7), (3000, 2.5), (6000, -11.5), (15000, -39)]
    patter = coloured(touches, lambda hz: read(wet, hz))
    out = np.zeros((2, N))
    for s, length, thump_db, wet_db in HANDFULS:
        out += amp(thump_db) * bumps * pour(s, length, THUMP_FALL_DB_PER_S)
        out += amp(wet_db) * patter * pour(s, length, PATTER_FALL_DB_PER_S)
    return out


# single cubes reach the bare metal: start_s, level_db, brightness_db_per_octave
STRAY_CUBES = [(7.022, -43, 20), (7.13, -29, 3), (7.185, -30, 1), (7.248, -30, 2.5), (7.3, -55, 8),
               (7.314, -30.5, 1), (7.337, -32.5, 5), (7.372, -32, 4), (7.415, -39, -2), (7.875, -36.5, 5.5),
               (7.935, -47, -6), (7.982, -44, 7), (8.001, -47, 4), (8.21, -36.5, 3)]
# the pan's floor under one cube, before brightness and spot: pitch_hz, level_db, t60_s
PAN_MODES = [(137.3, 4, 0.22), (229.4, 0, 0.3), (312, -0.5, 0.14), (453, 3, 0.085), (506, -4, 0.12),
             (638, -5, 0.044), (747, -12.5, 0.33), (1033, -18, 0.24), (1320, -30, 0.39)]


def stray_cubes(soft_s=0.0012, spot_db=2, pivot_hz=450):
    """A cube rolls off the heap and rings the pan; each spot favours other modes."""
    out = np.zeros((2, N))
    for s, db, tilt_db in STRAY_CUBES:
        spot = spot_db * rng.standard_normal(len(PAN_MODES))
        modes = [(hz, mode_db + luck + tilt_db * np.log2(hz / pivot_hz), t60)
                 for (hz, mode_db, t60), luck in zip(PAN_MODES, spot)]
        add(out, s, amp(db) * ring(modes) * (1 - np.exp(-AFTER / soft_s)))
    return out


def scene():
    """Everything at the worktop."""
    chopping = knocks() + slicing() + blade() + juddering()
    landings = thuds() + taps()
    pan = tumbling() + stray_cubes()
    return background() + chopping + landings + pan


# SQUEEZE is the share of the excess level that is taken away
THRESHOLD_DB, SQUEEZE, ATTACK_S, RECOVER_DB_PER_S = -25.5, 0.62, 0.0063, 13


def gain_control(x):
    """Turns down within milliseconds of a loud sound and creeps back."""
    power = signal.lfilter(np.hanning(256) / 128, 1, (x ** 2).mean(0))
    cut_db = SQUEEZE * np.maximum(10 * np.log10(power + 1e-12) - THRESHOLD_DB, 0)
    recovery = RECOVER_DB_PER_S * TIME[:len(power)]
    held_db = np.maximum.accumulate(cut_db + recovery) - recovery
    lag = np.exp(-1 / (ATTACK_S * SR))
    return x * amp(-signal.lfilter([1 - lag], [1, -lag], held_db))


def overload(x, ceiling):
    """Rounded clipping."""
    return x / (1 + (x / ceiling) ** 6) ** (1 / 6)


EDGE_HZ = 16300  # upper band limit


def record(dry):
    """Gain control and clipping, starting afresh with each stretch; then the band limit."""
    parts = np.split(dry, [round(s * SR) for s in STRETCH_STARTS[1:]], axis=1)
    levelled = np.hstack([overload(gain_control(part), amp(ceiling_db))
                          for part, (*_, ceiling_db) in zip(parts, STRETCHES)])
    edge = signal.firwin(255, EDGE_HZ, window=("kaiser", 8), fs=SR)
    return signal.oaconvolve(np.clip(levelled, -1, 1), edge[None], "same")


dry = scene()
out = record(dry)
file_out(out)
```